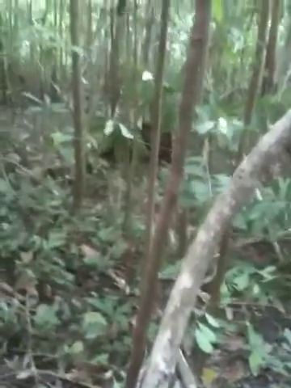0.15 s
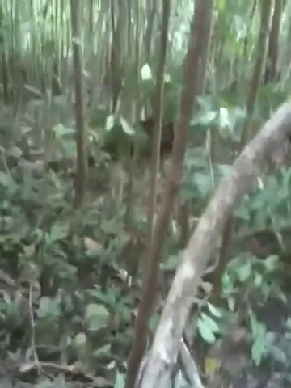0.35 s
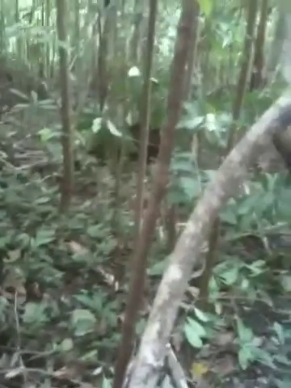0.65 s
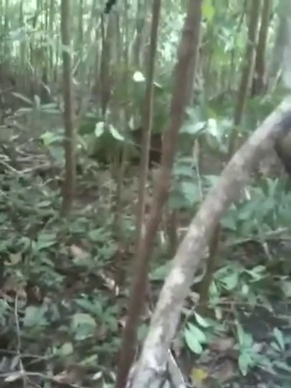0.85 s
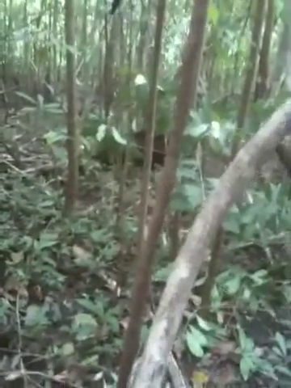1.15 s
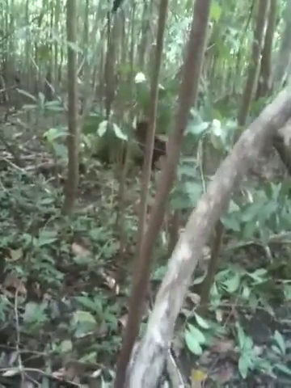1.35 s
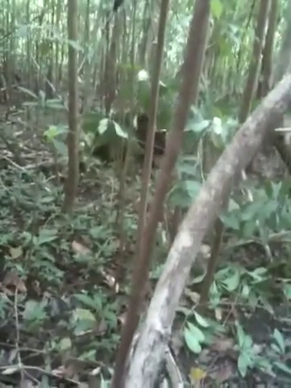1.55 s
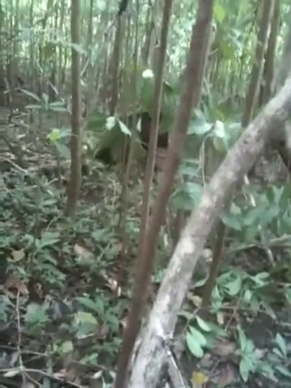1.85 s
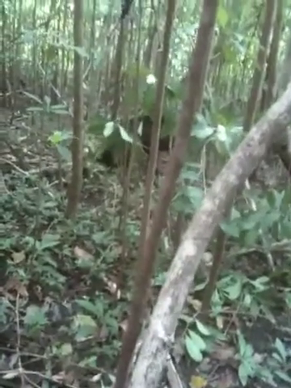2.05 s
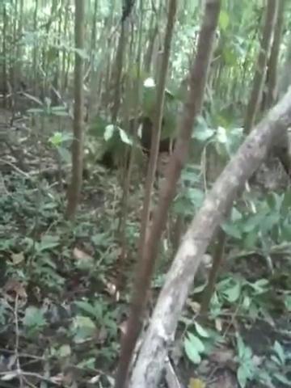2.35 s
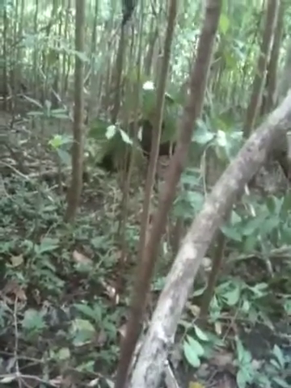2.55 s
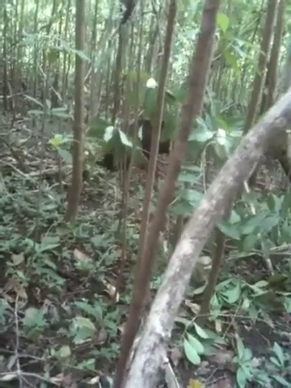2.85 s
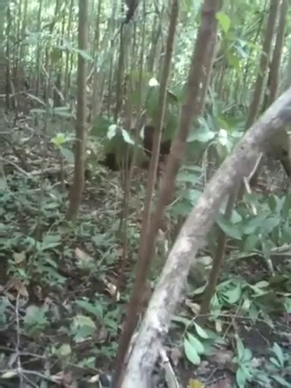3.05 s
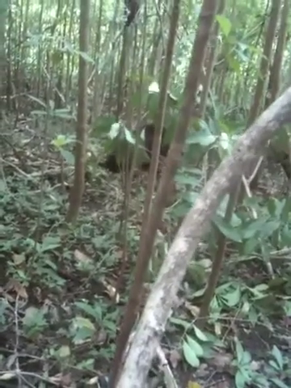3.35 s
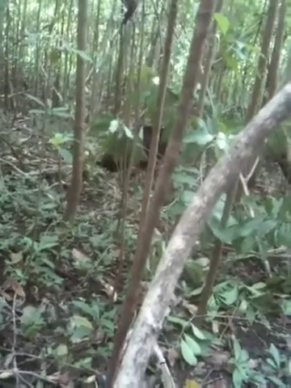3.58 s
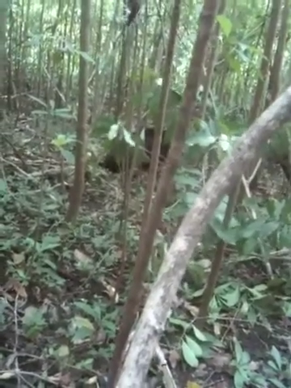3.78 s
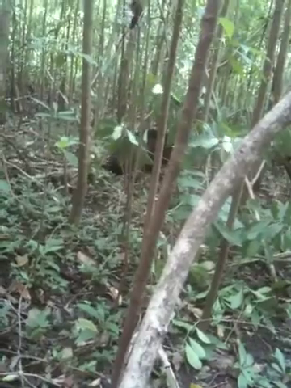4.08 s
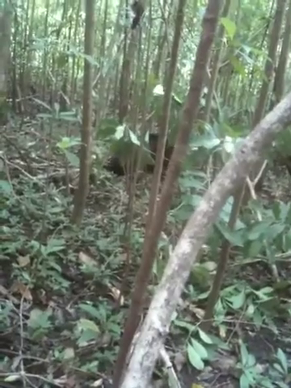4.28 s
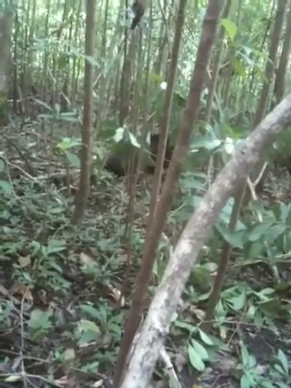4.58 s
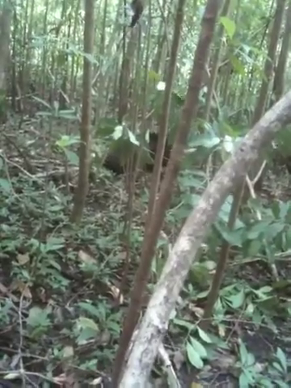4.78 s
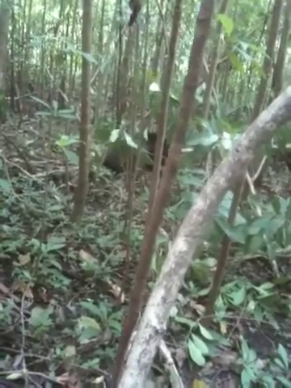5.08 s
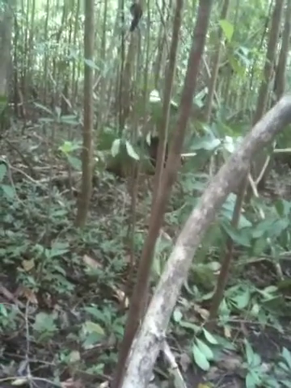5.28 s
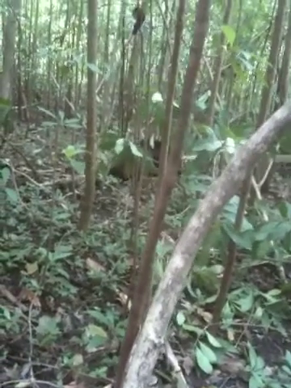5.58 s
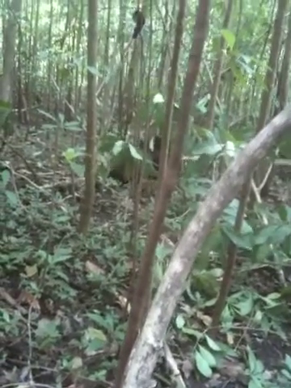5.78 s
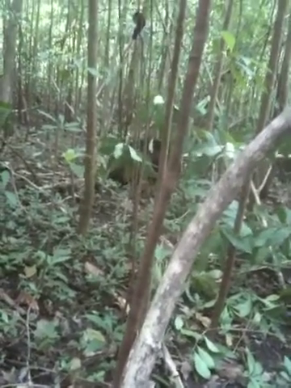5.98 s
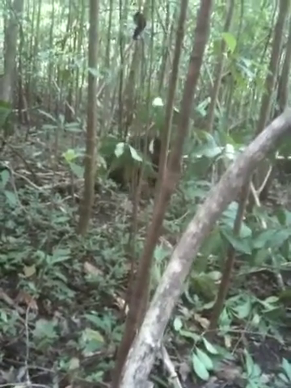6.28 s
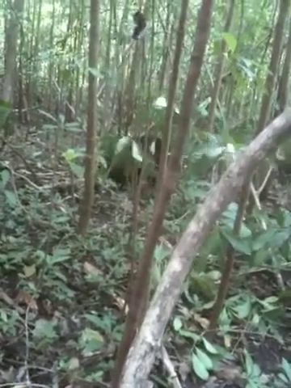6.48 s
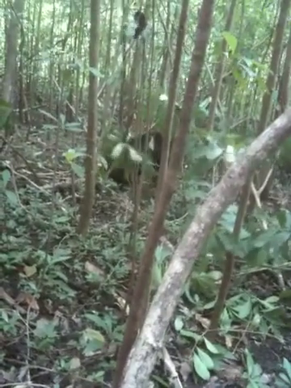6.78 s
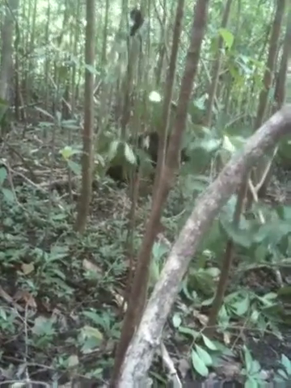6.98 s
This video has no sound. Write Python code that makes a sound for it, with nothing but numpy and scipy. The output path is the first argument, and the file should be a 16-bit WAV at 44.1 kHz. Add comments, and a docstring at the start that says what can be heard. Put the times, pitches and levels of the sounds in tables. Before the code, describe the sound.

Twigs snap in dry leaf litter in a quiet forest. A wild boar, some way from the microphone, gives a thin nasal whine and a quick run of harsh grunts. It slows to rough, breathy snorts with small whines and squeaks while sticks crack. Near the end the grunting resumes, and a bird deeper in the trees whistles a few short, faint notes.

```python
"""Wild boar in a forest

A boar, some way off, grunts in harsh bursts: loose throat tissue slaps unevenly and air rasps through
its snout. Between two runs of grunts it snorts more slowly, with a thin nasal whine. A bird whistles,
mostly near the end, twigs snap in the leaf litter, and trunks and foliage scatter these sounds."""
import sys
import numpy as np
from scipy import signal
from scipy.fft import rfft, irfft, next_fast_len
from scipy.io import wavfile
from scipy.ndimage import map_coordinates

SR = 44100
rng = np.random.default_rng(int(sys.argv[2]) if len(sys.argv) > 2 else 0)


def store_pcm(level_fs):
    """Save levels as 16-bit WAV."""
    pcm = np.round(np.clip(level_fs, -1, 1) * 32767).astype(np.int16)
    wavfile.write(sys.argv[1], SR, np.atleast_2d(pcm).T)


N = 314433


def amp(db):
    """Decibels to amplitude ratio."""
    return 10 ** (np.asarray(db) / 20)


def unit(x):
    """Normalisation to rms 1."""
    return x / np.sqrt(np.mean(x ** 2) + 1e-20)


def along(points, hz):
    """Interpolation of (frequency, value) points on a logarithmic frequency axis."""
    f, v = np.transpose(points)
    return np.interp(np.log(hz + 1), np.log(f + 1), v)


def wobble(rate, n):
    """Smooth random modulation: n samples of a spline with rate knots a second."""
    return map_coordinates(rng.standard_normal(int(n * rate / SR) + 4), [np.arange(n) * rate / SR])


def filtered(x, gain):
    """Minimum-phase filtering: folding the cepstrum makes the response gain(f) causal."""
    m = 2 * next_fast_len(len(x) // 2 + 4096)
    cepstrum = irfft(np.log(np.maximum(gain(np.fft.rfftfreq(m, 1 / SR)), 1e-6)), m)
    cepstrum[1:m // 2] *= 2
    cepstrum[m // 2 + 1:] = 0
    return irfft(rfft(x, m) * np.exp(rfft(cepstrum)), m)[:len(x)]


def peak(f, hz, width, db):
    """Power response of a steep resonance."""
    return amp(db) ** 2 / (1 + ((f - hz) / width) ** 2) ** 2


def add(track, start_s, sound):
    """Superposition of a sound on the track."""
    part = track[max(round(start_s * SR), 0):][:len(sound)]
    part += sound[:len(part)]


# spectra of the forest's hush and of dry leaves: frequency_hz, level_db
HUSH_SPECTRUM = [(18, -100), (30, -55), (120, -14.5), (161, -14), (183, -13), (435, -16.5), (496, -10),
                 (566, -17), (2150, -28), (2590, -22.5), (2870, -35.5), (3110, -26.5), (3360, -31),
                 (7780, -28.5), (15800, -41)]
LEAF_SPECTRUM = [(180, -31), (300, -11), (527, -2.5), (1110, -12.5), (1310, -13), (2200, -7.5), (2550, -9),
                 (3730, -11), (7620, -5), (15800, -15)]
# shuffling in dry leaves: time_s, level_db
RUSTLE = [(0, -50.5), (.3, -54.5), (.4, -57.5), (.57, -57), (.75, -66), (1.25, -70.5), (1.55, -52.5),
          (2.2, -61), (2.88, -67), (3.15, -52), (3.68, -74), (4.05, -65), (4.5, -61.5), (5.2, -85),
          (5.5, -67), (6.2, -57), (6.55, -53), (7.13, -58)]
def undergrowth():
    """Amplitude-modulated noise: a slow drift gives the hush, a fast one the crackle of leaves."""
    hush = unit(filtered(rng.standard_normal(N), lambda f: amp(along(HUSH_SPECTRUM, f))))
    grains = rng.standard_normal(N) * amp(1.5 * wobble(350, N) + 0.64 * wobble(28, N))
    leaves = unit(filtered(grains, lambda f: amp(along(LEAF_SPECTRUM, f))))
    shuffle = amp(np.interp(np.arange(N) / SR, *np.transpose(RUSTLE)))
    return amp(-63.5 + 0.73 * wobble(4.13, N)) * hush + shuffle * leaves


# reverberation time of the forest: frequency_hz, t60_s
FOREST_DECAY = [(100, 0.36), (600, 0.57), (1600, 0.59), (2800, 1), (8000, 0.63), (15000, 0.89)]
def forest_reverb(x):
    """Multiple scattering by trunks and foliage leaves a tail that decays exponentially in each band."""
    hz, t, noise = signal.stft(rng.standard_normal(SR), SR, nperseg=256)
    decay = amp(-60 * t / along(FOREST_DECAY, hz)[:, None])
    build_up = 1 - np.exp(-t / 0.013)
    tail = signal.istft(noise * decay * build_up, SR, nperseg=256)[1]
    return signal.fftconvolve(x, tail / np.linalg.norm(tail))[:N]


def trunk_echoes(x, echo_db, spread_s, count=9):
    """Comb filtering: weak reflections off nearby trunks interfere with the direct sound and hollow it."""
    out = x.copy()
    for delay_s, size in zip(rng.uniform(.0008, spread_s, count), rng.standard_normal(count)):
        add(out, delay_s, amp(echo_db) * size / np.sqrt(count) * x)
    return out * np.linalg.norm(x) / np.linalg.norm(out)


# bird notes: start_s, length_s, first_hz, last_hz, level_db
WHISTLES = [(0.898, .15, 3100, 2950, -73.5), (5.659, 0.14, 3000, 2990, -53.5),
            (5.927, 0.115, 2733, 2705, -47), (6.131, .11, 3070, 2980, -59),
            (6.402, 0.072, 2020, 2360, -51.5), (6.624, .08, 2500, 3080, -44),
            (6.878, 0.048, 2693, 2670, -44.5), (6.93, 0.078, 2407, 2420, -52.5),
            (7.069, 0.054, 3400, 3323, -49), (7.085, 0.053, 3150, 2680, -51)]
def bird(bow_hz=28.4, swell_db=6):
    """Frequency-modulated tones glide and flutter, blurred by interference with their reflections."""
    track = np.zeros(N)
    for start_s, length_s, first_hz, last_hz, db in WHISTLES:
        t = np.arange(0, length_s + .08, 1 / SR)
        progress = np.minimum(t / length_s, 1)
        bow = 4 * progress * (1 - progress)  # lifts pitch and level in mid-note
        flutter = 1 + .014 * wobble(380, len(t))
        pitch = (first_hz + (last_hz - first_hz) * progress + bow_hz * bow) * flutter
        fade = np.clip(np.minimum(t, length_s - t) / 0.0035, 0, 1)
        level = fade * amp(db - swell_db * (1 - bow) + 5.7 * wobble(50.5, len(t)))
        note = level * np.sin(2 * np.pi * np.cumsum(pitch) / SR)
        add(track, start_s, trunk_echoes(note, echo_db=-4, spread_s=.045))
    return track


def fracture(crack_t60_s, crumble_db, crumble_t60_s):
    """A noise transient with two exponential decays: a fast crack and a slower crumble."""
    t = np.arange(SR // 4) / SR
    envelope = amp(-60 * t / crack_t60_s) + amp(crumble_db - 60 * t / crumble_t60_s)
    return rng.standard_normal(len(t)) * envelope


# snapping twigs: start_s, level_db, crumble_db (relative to the crack)
TWIGS = [(0.197, -34.5, -4), (0.254, -26.5, -9), (0.4576, -32.5, -14.5), (0.4919, -32, -3),
         (0.575, -43, -2), (3.9, -35.5, -16), (4.81, -51, -8), (6.846, -38.5, 1), (1.0348, -49.5, -10),
         (4.0175, -32, -3), (4.1787, -43.5, -1), (4.3024, -40, -16), (4.6268, -36, -11.5),
         (4.9317, -38, -8.5), (5.4668, -28, -17), (5.635, -34, -1.5), (6.434, -32.5, -8), (6.595, -35, 6.5)]
def twigs():
    """Brittle fracture is brief and so broadband: a bright crack, then a crumble of leaves."""
    track = np.zeros(N)
    for start_s, db, crumble_db in TWIGS:
        crack = fracture(0.0046, crumble_db, crumble_t60_s=0.27)
        snap = filtered(crack, lambda f: amp(along(LEAF_SPECTRUM, f)) * f / np.hypot(f, 2500))
        add(track, start_s, amp(db - .5) * snap / np.abs(snap).max())
    return track


# cracking sticks: start_s, level_db, ring_hz
STICKS = [(0.254, -41, 900), (0.281, -35, 2650), (0.572, -52, 447), (3.292, -28, 2660), (4.056, -35, 850),
          (4.309, -26.5, 915), (4.49, -39.5, 2020)]
def sticks():
    """Fracture excites a heavily damped resonance, so thicker sticks ring briefly."""
    track = np.zeros(N)
    for start_s, db, ring_hz in STICKS:
        crack = fracture(0.038, crumble_db=-11, crumble_t60_s=0.19)
        snap = filtered(crack, lambda f: np.sqrt(peak(f, ring_hz, 560, 0) / (1 + (500 / (f + 1)) ** 6)))
        add(track, start_s, amp(db - 4.5) * snap / np.abs(snap).max())
    return track


ATTACK_S = .007  # the throat opens
def breath(t, rise_s, fall_s, db, arc):
    """Amplitude envelope of a call: effort climbs to a crest, sags and is released."""
    climb_db, sag_db, release_db_per_s = arc
    climb = climb_db * np.clip(1 - t / rise_s, 0, 1) ** 2
    sag = sag_db * np.clip((t - rise_s) / fall_s, 0, 1)
    release = release_db_per_s * np.maximum(t - rise_s - fall_s, 0)
    return amp(db - climb - sag - release) * np.clip(t / ATTACK_S, 0, 1)


# nostril wheezes through the longest snort, rough squeaks after it: start_s, rise_s, fall_s, level_db
WHEEZES = [(4.172, 0.05, 0.032, -48), (4.285, 0.034, .04, -45.5)]
SQUEAKS = [(4.385, .02, 0.073, -48), (4.56, 0.062, 0.052, -60)]
# their resonances: centre_hz, width_hz, gain_db
WHEEZE_RINGS = [(5650, 540, 2), (7180, 1100, -3)]
SQUEAK_RINGS = [(1580, 110, -2.5), (2230, 130, 2)]
def snout_whistles(events, rings, arc=(12, 12, 270)):
    """Air forced through the nearly closed snout excites resonances, giving narrow bands of noise."""
    t = np.arange(N) / SR
    bands = filtered(rng.standard_normal(N), lambda f: np.sqrt(sum(peak(f, *ring) for ring in rings)))
    return unit(bands) * sum(breath(t - start_s, *envelope, arc) for start_s, *envelope in events)


def slaps(t, rate, effort, crest_s, jitter=2.4, scatter_db=2.0):
    """Aperiodic vibration: throat closures form a pulse train with jitter and shimmer."""
    cycles = np.cumsum(rate * np.exp(jitter / np.sqrt(rate) * wobble(rate, len(t)))) / SR
    onset, crest = np.searchsorted(t, [ATTACK_S, max(crest_s, ATTACK_S)])
    closures = np.flatnonzero(np.diff(np.floor(cycles - cycles[crest + 1])))
    train = np.zeros(len(t))
    train[closures] = amp(scatter_db * rng.standard_normal(len(closures))) * effort[closures]
    train *= np.linalg.norm(effort) / (np.linalg.norm(train) + 1e-12)
    train[onset] = max(train[onset], amp(16) * effort[onset])  # the throat bursts open
    train[crest] = max(train[crest], amp(19.5) * effort[crest])  # a hard slap on the crest
    return train


def puffs(drive, life_s):
    """Leaky integration spreads each pulse into a dying puff of air of the same energy."""
    pole = np.exp(-1 / (life_s * SR))
    return np.sqrt(signal.lfilter([1 - pole], [1, -pole], drive ** 2))


# spectrum of the snout's hiss: frequency_hz, level_db
HISS_SPECTRUM = [(100, -33), (1000, 4), (3000, 2), (3700, -3.5), (5300, 1), (7000, -0.5), (8300, -3.5),
                 (10000, -1.5), (15500, -13)]
# nostril resonances: centre_hz, width_hz, gain_db
NOSTRIL_RINGS = [(4400, 260, -2.5), (5640, 300, 0.5), (8500, 560, 4.5), (9070, 470, -0.5)]
def nostril_gain(f, hiss_db, flare):
    """Cavity resonances, each shifted by its flare factor, put hollow peaks on a broad hiss."""
    peaks = sum(peak(f, hz * shift, width, db) for shift, (hz, width, db) in zip(flare, NOSTRIL_RINGS))
    return amp(hiss_db + 2.5 + along(HISS_SPECTRUM, f)) * np.sqrt(0.86 + peaks)


# narrow rings that give the calls a hollow colour: centre_hz, width_hz, gain_db
HOLLOW_RINGS = [(585, 49, 2.5), (1240, 38, 1), (1534, 40, -1), (1708, 72, 0), (1940, 68, 5.5),
                (2350, 22, 9)]
def tract_gain(f, tract, formant_scale, ring_scale):
    """Parallel resonances of chest, mouth (formants f1 to f3) and snout, coloured by narrow rings."""
    chest_db, f1_hz, f2_hz, f2_db, f3_hz, f3_db, snout_db = tract
    chest = (peak(f, 85, 38, chest_db / 2 - 6.5) + peak(f, 199, 55, chest_db + 3.5)
             + peak(f, 377, 85, chest_db - 0.5))
    scaled = f / formant_scale
    mouth = (peak(scaled, f1_hz, 131, 0) + peak(scaled, f2_hz, 79, f2_db)
             + peak(scaled, f3_hz, 168, f3_db - .5))
    snout = (peak(f, 1980, 160, (f3_db + snout_db) / 2 - 5.0) + peak(f, 2490, 330, snout_db - .5)
             + peak(f, 3300, 330, f3_db - 26))
    hollow = 1 + sum(peak(f * ring_scale, *ring) for ring in HOLLOW_RINGS)
    bass_loss = 1 + (96 / (f + 1)) ** 10
    return np.sqrt((chest + mouth + snout) * hollow / bass_loss)


def boar_call(rise_s, fall_s, db, arc, slap_hz, tract, hiss_db):
    """Source and filter: slaps, puffs and rasp excite the vocal tract; the snout's hiss lags behind."""
    t = np.arange(0, rise_s + fall_s + .07, 1 / SR)
    noise = lambda: rng.standard_normal(len(t))
    effort = breath(t, rise_s, fall_s, db, arc)
    train = slaps(t, slap_hz, effort, crest_s=rise_s)
    rasp = 0.78 * np.sqrt(85 / slap_hz)  # fast vibration is more voiced, slow flapping more airy
    source = train + 1.08 * puffs(train, life_s=0.0029) * noise() + rasp * effort * noise()
    flare = np.exp(0.041 * rng.standard_normal(len(NOSTRIL_RINGS)))  # varies from call to call
    ring_scale = np.exp(0.02 * rng.standard_normal())
    opening = np.pi / 2 * np.clip(t / rise_s, 0, 1)  # the mouth opens and the formants rise
    closed = filtered(source * np.cos(opening) ** 2, lambda f: tract_gain(f, tract, 0.944, ring_scale))
    wide = filtered(source * np.sin(opening) ** 2, lambda f: tract_gain(f, tract, 1, ring_scale))
    voice = trunk_echoes(closed + wide, echo_db=-10.5, spread_s=.02)
    airflow = 0.54 * puffs(train, life_s=0.011) + .5 * puffs(effort, life_s=.027)
    hiss = filtered(airflow * noise(), lambda f: nostril_gain(f, hiss_db, flare))
    hiss = trunk_echoes(hiss, echo_db=-1.0, spread_s=.007)
    return (voice + hiss) * np.linalg.norm(effort) / np.linalg.norm(voice)


# nasal whines: start_s, rise_s, fall_s, effort_db, f2_hz, f3_hz, f3_db, snout_db, hiss_db
WHINES = [(.085, .02, 0.1, -53, 790, 1345, 14.5, -24, -19),
          (1.275, .085, 0.2, -40, 810, 1250, -1, -19, -10.5),
          (3.87, .03, 0.11, -46.5, 943, 1730, 1, -3, -11.5),
          (4.765, .03, 0.098, -49, 963, 1707, -11, -5.5, -15),
          (4.98, .02, 0.086, -60.5, 1050, 1707, -4, -3, -21),
          (5.405, .055, 0.14, -42.5, 920, 1630, 4, -4.5, -13)]
def whines(slap_hz=140, chest_db=-0.5, f1_hz=557, f2_db=12.5, arc=(10.4, 6.3, 300)):
    """Formant emphasis: fast pulses through a strong second resonance sound thin and nasal."""
    track = np.zeros(N)
    for start_s, rise_s, fall_s, db, f2_hz, f3_hz, f3_db, snout_db, hiss_db in WHINES:
        tract = chest_db, f1_hz, f2_hz, f2_db, f3_hz, f3_db, snout_db
        add(track, start_s, boar_call(rise_s, fall_s, db, arc, slap_hz, tract, hiss_db))
    return track


# snorts: start_s, rise_s, fall_s, effort_db, chest_db, f1_hz, f2_db, f3_db, snout_db, hiss_db
SNORTS = [(3.446, .014, .08, -40, -6.5, 503, 3.5, -7.5, -24, -19),
          (3.769, .008, 0.077, -39, -11.5, 540, -6, -9.5, -15, -24.5),
          (4.211, .052, .1, -39, -9.5, 528, -5, -14.5, -13.5, -19.5),
          (4.668, .063, 0.035, -44.5, -10.5, 523, 0, -19, -12, -22.5),
          (5.284, .073, 0.036, -41.5, -10, 546, -4, -10, -10.5, -24),
          (5.793, .009, .095, -38.5, 0.5, 684, 9, 4.5, -5, -12),
          (6.472, .053, 0.0039, -38.5, -7, 780, -6, -2.5, -11, -19)]
def snorts(slap_hz=55, f2_hz=843, f3_hz=1640, arc=(3, 4.05, 700)):
    """Slow pulses are heard as roughness: the throat flaps at nearly full force from the start."""
    track = np.zeros(N)
    for start_s, rise_s, fall_s, db, chest_db, f1_hz, f2_db, f3_db, snout_db, hiss_db in SNORTS:
        tract = chest_db, f1_hz, f2_hz, f2_db, f3_hz, f3_db, snout_db
        add(track, start_s, boar_call(rise_s, fall_s, db, arc, slap_hz, tract, hiss_db))
    return track


# grunts: start_s, rise_s, fall_s, effort_db, chest_db, f1_hz, f2_db, f3_hz, f3_db, snout_db, hiss_db
GRUNTS = [(1.412, 0.082, 0.023, -30.5, -8.5, 670, -11, 1580, -6, -13.5, -16),
          (1.585, .024, 0.0076, -45.5, -10.5, 470, -8, 1330, -6, -14, -25),
          (1.655, 0.033, 0.011, -37.5, 4, 597, 6, 1580, 1, -8, -8.5),
          (1.838, .056, 0.03, -36.5, -0.5, 626, 3, 1530, 5, -21, -12.5),
          (2.044, .034, 0.06, -33.5, .5, 493, 1.5, 1570, 1, -18, -16),
          (2.3, .046, 0.013, -32, -10, 600, -0.5, 1550, -2, -17, -20),
          (2.484, .05, 0.028, -27.5, -9.5, 550, -3.5, 1595, 2.5, -10.5, -17),
          (2.729, .033, 0.033, -28, -6.5, 575, -8, 1644, 2, -15, -18.5),
          (2.944, 0.046, .052, -29, -6.5, 535, 3.5, 1660, 1.5, -15.5, -18),
          (3.18, .058, .026, -36, -2, 650, -9, 1350, -7, -30, -23),
          (6.02, 0.058, 0.038, -37, -10, 670, -17, 1610, -6, -15, -17.5),
          (6.255, 0.056, .025, -32.5, -.5, 660, -14, 1560, -5.5, -14.5, -17.5),
          (6.668, .04, 0.044, -32.5, 3.5, 604, 12, 1460, 6.5, -0.5, -8),
          (6.892, 0.024, 0.041, -39.5, -0.5, 704, 3, 1450, -0.5, -6.5, -14)]
def grunts(base_slap_hz=128, chest_db_per_octave=12, f2_hz=788, arc=(12.3, 6.7, 810)):
    """Irregular vibration of loose tissue makes harsh bursts that swell and stop short."""
    track = np.zeros(N)
    for start_s, rise_s, fall_s, db, chest_db, f1_hz, f2_db, f3_hz, f3_db, snout_db, hiss_db in GRUNTS:
        slap_hz = base_slap_hz * 2 ** (chest_db / chest_db_per_octave)  # chestier grunts vibrate faster
        tract = chest_db, f1_hz, f2_hz, f2_db, f3_hz, f3_db, snout_db
        add(track, start_s, boar_call(rise_s, fall_s, db, arc, slap_hz, tract, hiss_db))
    return track


def scene():
    """The reverberant share grows with distance: the bird is deeper in the trees than the boar."""
    boar = grunts() + snorts() + whines()
    boar += snout_whistles(SQUEAKS, SQUEAK_RINGS) + snout_whistles(WHEEZES, WHEEZE_RINGS)
    ground = boar + twigs() + sticks()
    whistles = bird()
    reverb = forest_reverb(amp(-15) * ground + amp(-8.0) * whistles)
    return (ground + whistles + reverb + undergrowth())[None]


def record(dry, cutoff_hz=15850):
    """Band limiting: an ideal low-pass filter removes everything above the cutoff."""
    m = next_fast_len(N + SR // 2)
    passband = np.fft.rfftfreq(m, 1 / SR) < cutoff_hz
    return irfft(rfft(dry, m) * passband, m)[..., :N]


dry = scene()
out = record(dry)
store_pcm(out)
```